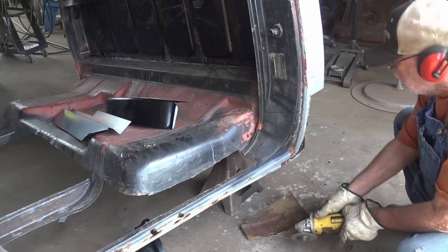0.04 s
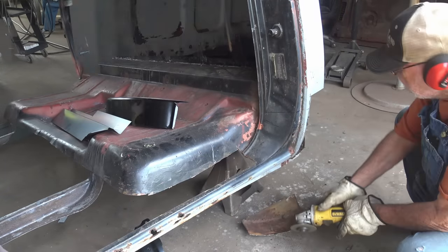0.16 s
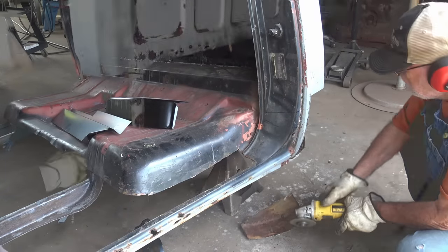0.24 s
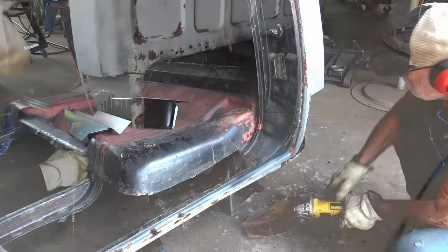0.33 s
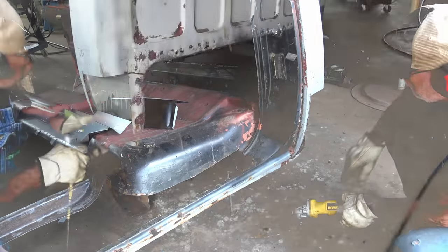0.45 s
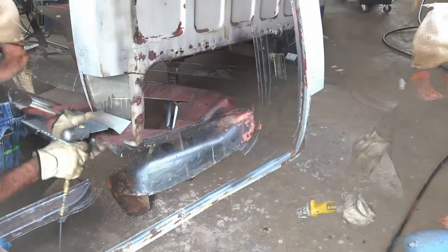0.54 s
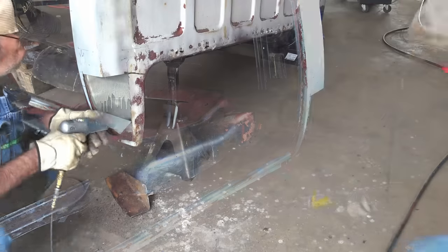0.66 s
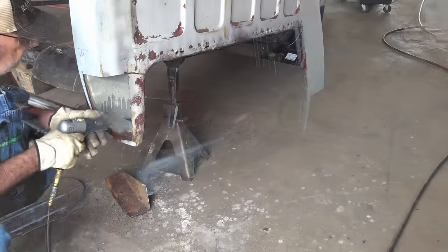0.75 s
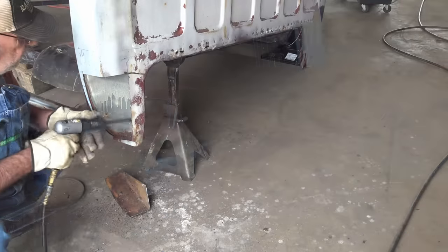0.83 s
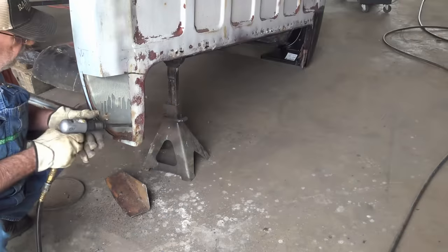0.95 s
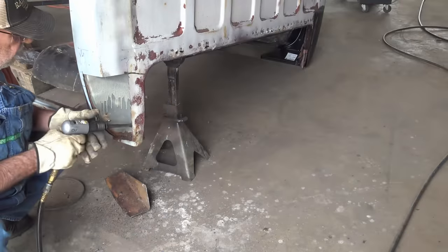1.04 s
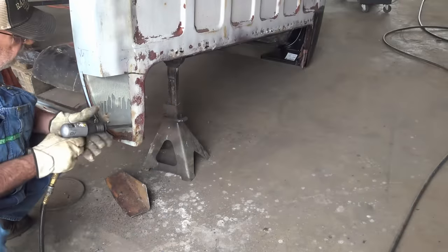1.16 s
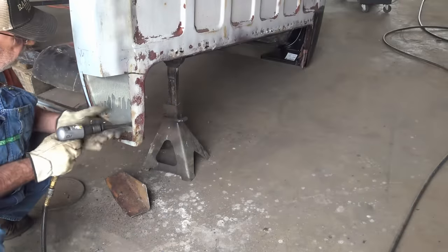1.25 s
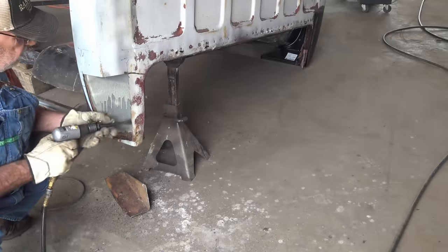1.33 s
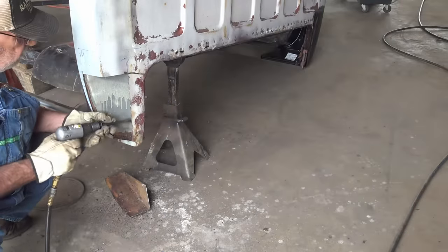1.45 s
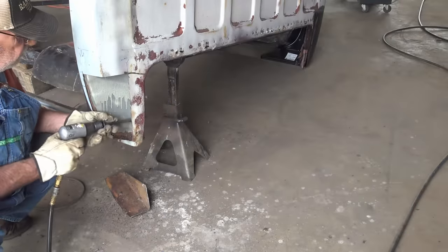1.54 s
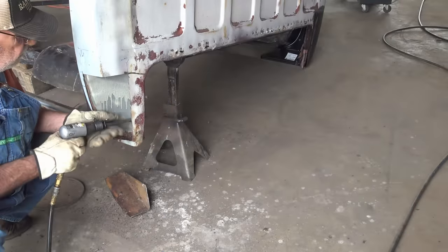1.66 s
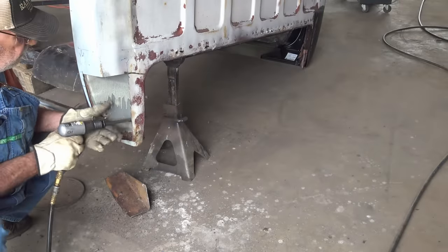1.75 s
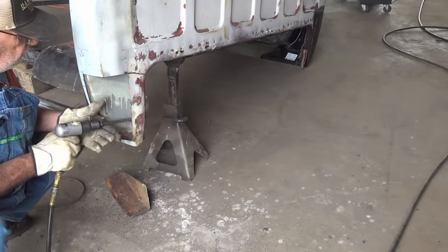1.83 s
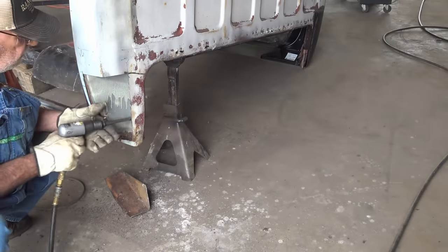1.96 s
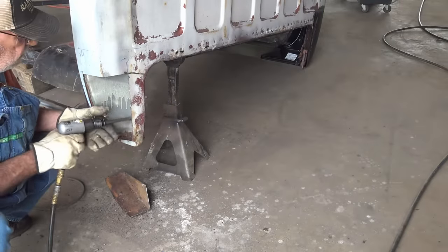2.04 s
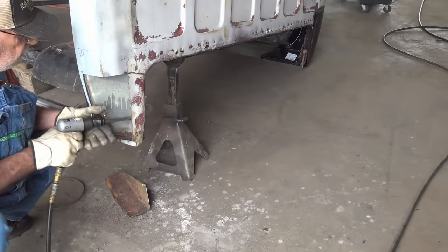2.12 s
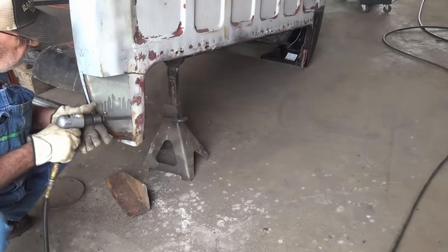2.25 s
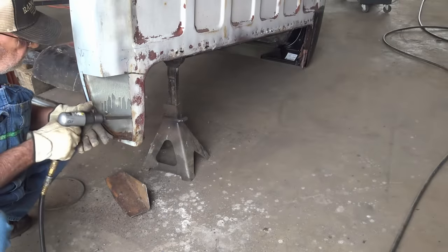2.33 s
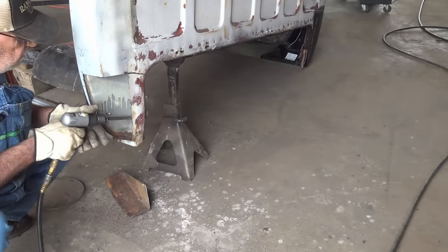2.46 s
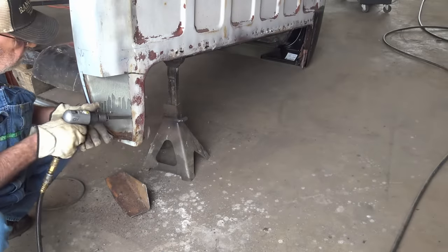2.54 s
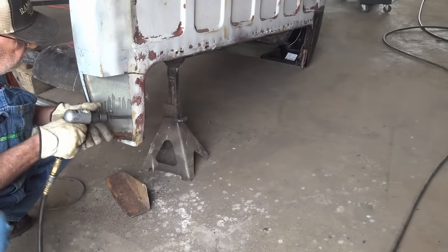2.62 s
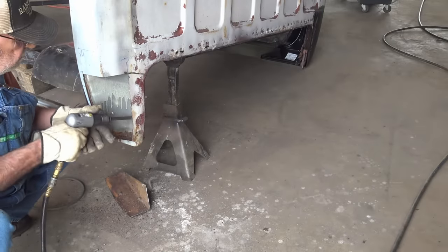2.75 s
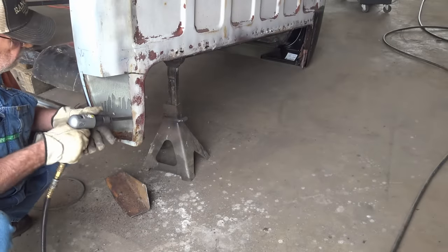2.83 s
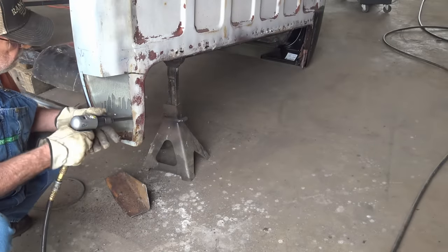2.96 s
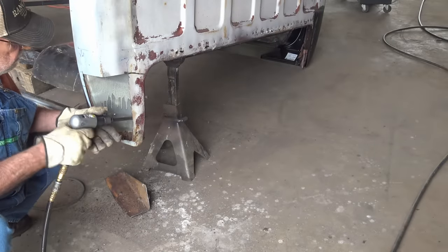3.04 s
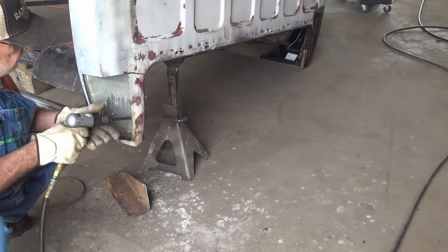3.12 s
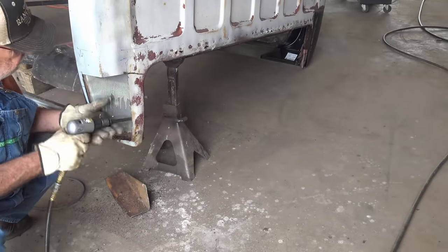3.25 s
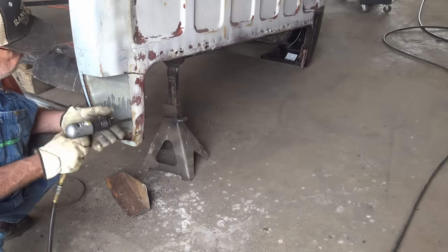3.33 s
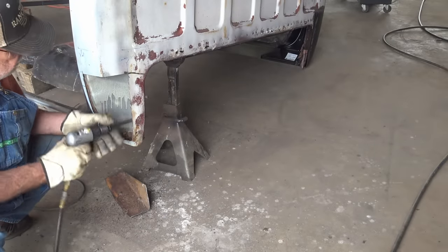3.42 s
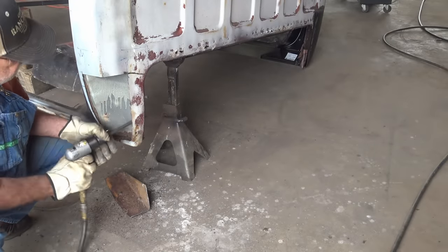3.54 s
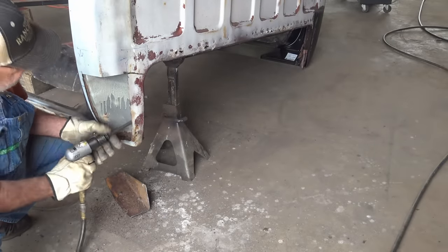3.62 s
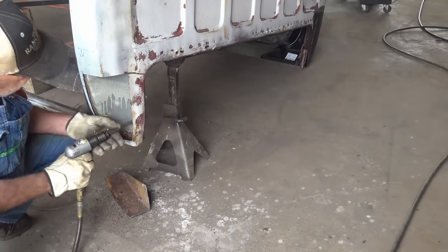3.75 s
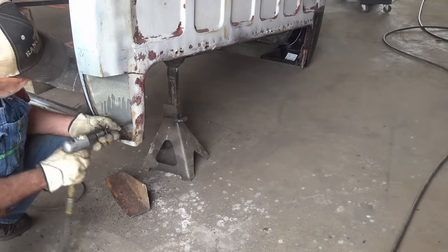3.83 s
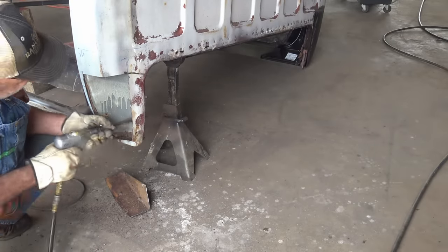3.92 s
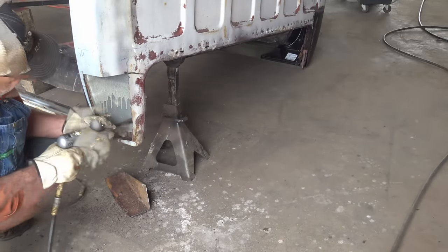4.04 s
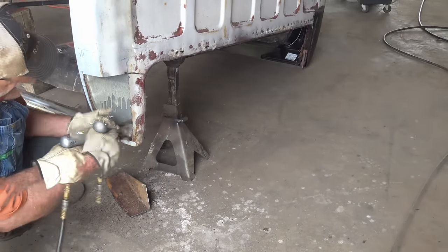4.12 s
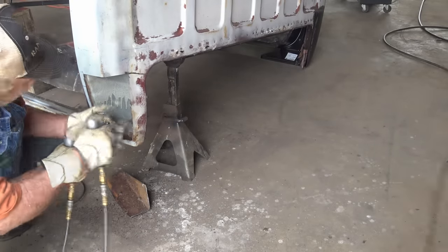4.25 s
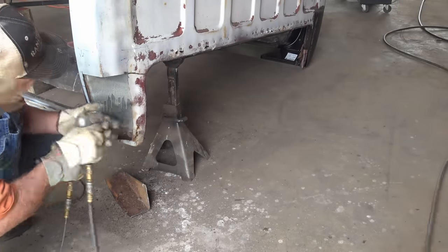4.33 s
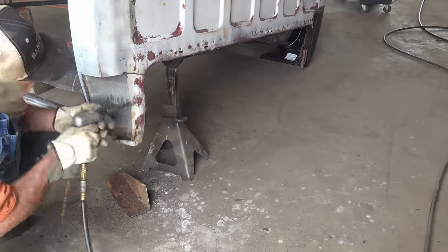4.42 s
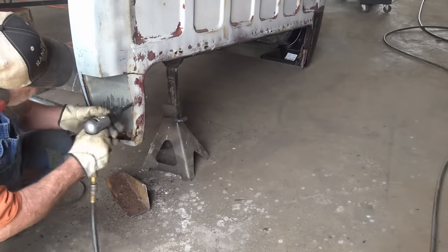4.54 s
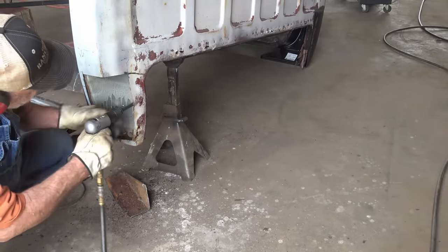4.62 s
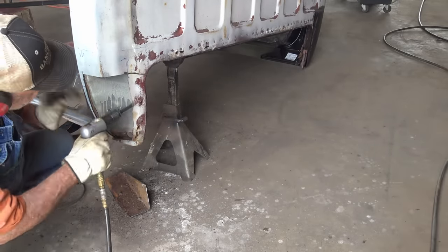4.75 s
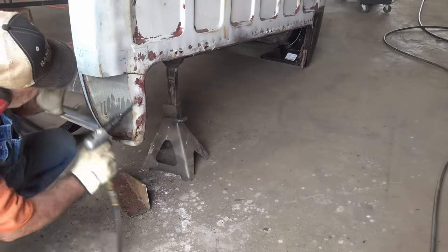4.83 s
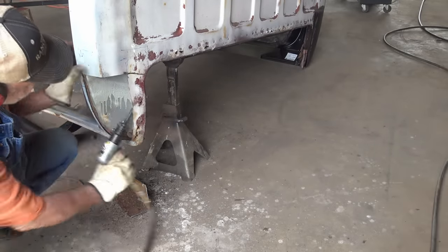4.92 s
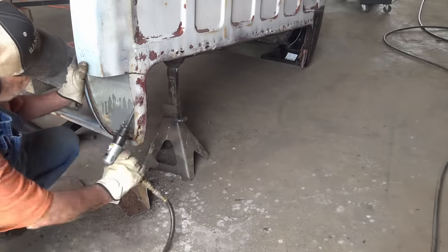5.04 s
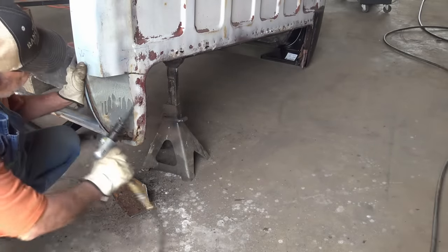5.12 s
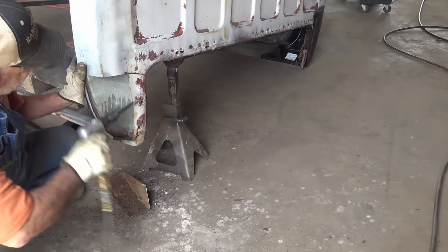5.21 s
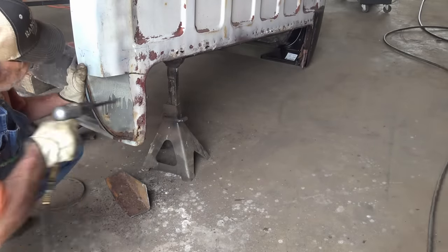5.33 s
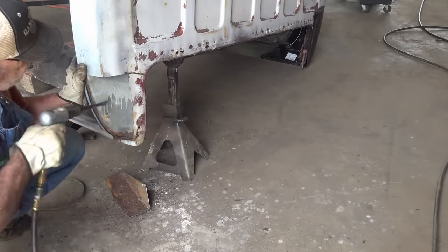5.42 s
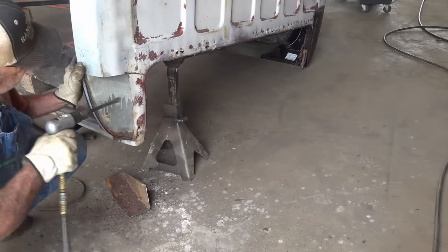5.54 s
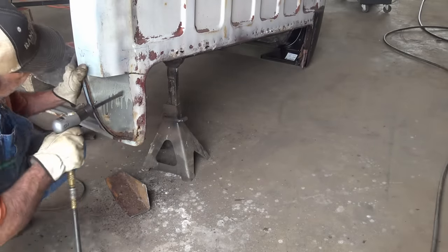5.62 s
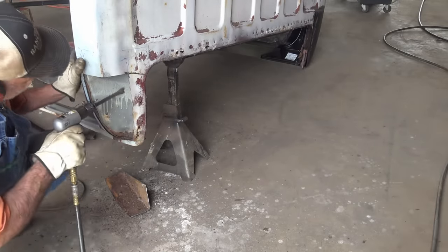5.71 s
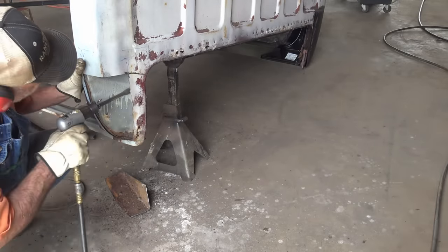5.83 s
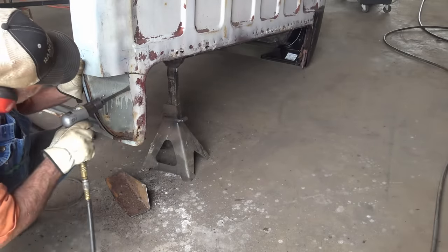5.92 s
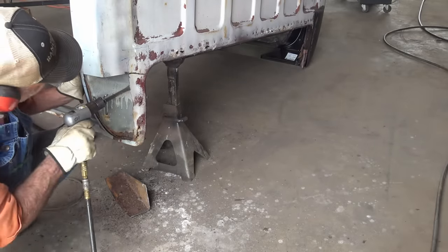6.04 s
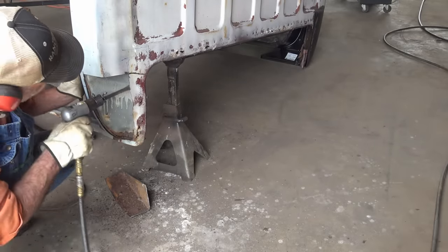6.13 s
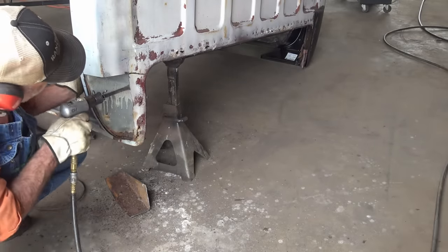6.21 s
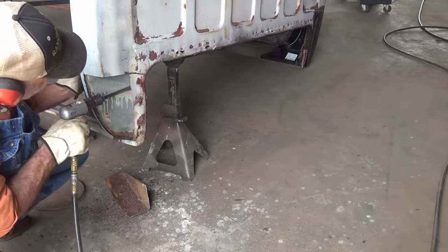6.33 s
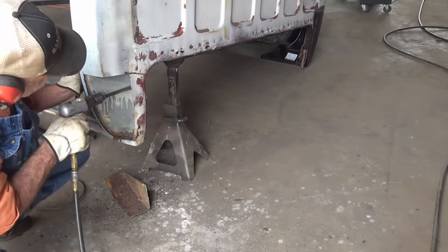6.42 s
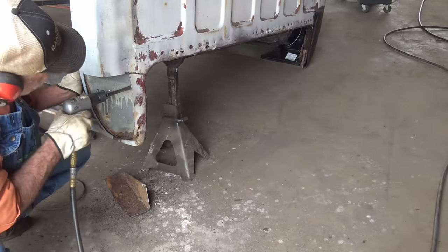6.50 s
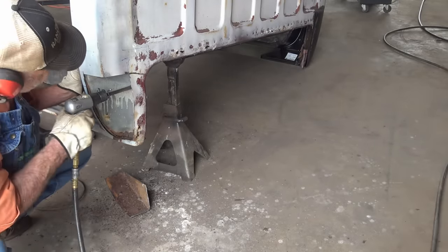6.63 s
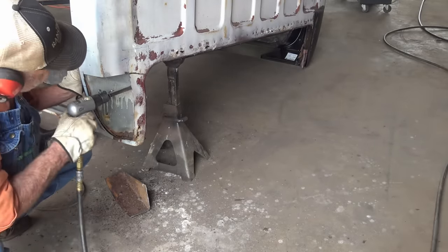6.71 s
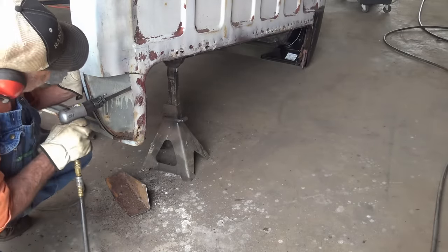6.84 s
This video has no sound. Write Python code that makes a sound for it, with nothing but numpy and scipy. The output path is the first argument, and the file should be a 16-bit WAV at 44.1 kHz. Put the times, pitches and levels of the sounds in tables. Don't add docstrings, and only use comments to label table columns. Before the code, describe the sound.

In a hard-walled workshop, a slowing grinder gives way to escaping air and a pneumatic chisel striking a truck body. Four rapid, clattering bursts come in the first half, bright steel cracks with ringing bit and booming panel. Quieter pauses hold hiss, hum and small metal taps; the hose spits, the bit knocks, then one last gentler burst. Close but roomy, with the microphone's gain dipping and recovering.

```python
import sys
import numpy as np
from scipy import signal
from scipy.fft import rfft, irfft, next_fast_len
from scipy.io import wavfile
from scipy.ndimage import uniform_filter1d, minimum_filter1d

SR = 44100
rng = np.random.default_rng(int(sys.argv[2]) if len(sys.argv) > 2 else 0)


def pcm_store(signal):
    levels = np.round(np.clip(np.atleast_2d(signal), -1, 1) * 32767)
    wavfile.write(sys.argv[1], SR, levels.astype(np.int16).T)


def nominal_scale(level):
    x = np.asarray(level, float) / 20
    return 10 ** x


N = 302967
T = np.arange(N) / SR
OPEN_S, CUT_S = 0.573, 4.245

# (frequency [Hz], level [dB per Hz])
RUMBLE_TONE = [(20, -16), (32, 13), (47, -1), (60, 9), (90, -1), (125, 5), (200, -16)]
# (frequency [Hz], width [Hz], level [dB])
SHED_HUM = [(140, 12, -1), (162, 7, -4), (188, 6, 0), (212, 6, -3), (300, 4, 1), (393, 4, 1)]
# (frequency [Hz], t60 [s])
ROOM_DECAY = [(130, 1.54), (300, 1.09), (600, 0.89), (1000, 0.87), (2500, 0.72), (6000, 0.59),
              (15000, 0.21)]
# (frequency [Hz], level [dB])
WALL_TONE = [(100, -1), (1000, 5.5), (4000, -0.5), (9000, -4), (15000, 3)]
# (frequency [Hz], t60 [s], level [dB])
STAND_MODES = [(705, 3.4, -48), (709, 3.4, -52)]

# (time [s], whine [Hz], whine level [dB], roar level [dB])
SPIN_DOWN = [
    (0.0, 9440, -59, -51.5),
    (0.09, 9030, -62, -50.5),
    (0.29, 8340, -64, -57.5),
    (0.405, 7930, -67, -60),
    (0.548, 7340, -81, -75),
    (0.562, 7390, -87, -82),
]
# (frequency [Hz], level [dB per Hz])
ROAR_TONE = [(35, -78), (60, -66), (200, -49), (590, -14), (962, -12), (1270, -5.5), (2810, -5),
             (7850, -11.5), (9030, -11), (15800, -25)]
# (frequency [Hz], width [Hz], level [dB])
HOUSING_BANDS = [(1314, 38, -5), (2960, 160, -0.5)]
# (frequency [Hz], t60 [s], level [dB])
CUT_STEEL = [(177, 1, -74), (450, 1, -66), (695, 1, -63), (725, 1, -87)]

# (frequency [Hz], level [dB per Hz])
LEAK_TONE = [(40, -27), (90, -37), (130, 2), (250, 1), (400, -1), (520, -1.5), (800, -10), (2000, -12),
             (3900, -10), (5000, -9.5), (8400, -8.5), (12000, -9.5), (15800, -16.5), (17000, -48)]
# (frequency [Hz], width [Hz], level [dB])
NOZZLE_BANDS = [(2570, 330, -27), (3780, 1260, -10), (6670, 150, -22), (7970, 1100, -13)]
# (time [s], hiss [dB])
AIR_FLOW = [(0.573, -23.5), (0.82, -28.5), (1.05, -42), (1.8, -37.5), (2.1, -45), (3.4, -50), (3.62, -45.5),
            (3.9, -47), (4.243, -47), (4.247, -53), (4.78, -51.5), (5.28, -46.5), (5.31, -43.5),
            (5.67, -40.5), (5.8, -40.5), (6.3, -36), (6.6, -41), (6.87, -54)]
# (time [s], level over the flow [dB], half length [s])
HOSE_SPITS = [
    (4.808, 4.5, 0.034),
    (4.864, 6.5, 0.074),
    (4.932, 9.5, 0.041),
    (4.999, 13, 0.049),
]
# (frequency [Hz], level [dB])
PUFF_TONE = [(150, -13), (800, 1.5), (3000, 6.5), (8000, 9), (14000, 7)]

# (time [s], force [dB], sheet pitch [Hz])
TOUCHES = [(1.539, -18, 393), (1.585, -20.5, 524), (1.619, -20, 480), (1.66, -45, 700), (4.078, -19, 935),
           (4.1, -20, 380), (4.159, -16, 556), (4.162, -19.5, 900), (4.172, -24, 550), (4.183, -22, 437),
           (4.205, -30, 500), (4.213, -19, 312), (4.574, -21.5, 405), (5.303, -20.5, 1390),
           (5.311, -16, 1330), (5.346, -15.5, 556), (5.385, -17.5, 490), (5.42, -20, 423),
           (5.728, -25, 480), (5.734, -21, 1000), (5.738, -20, 2250), (5.728, -14.5, 1360),
           (5.757, -24, 860), (5.79, -20.5, 1300)]
# (multiple of the pitch [ratio], t60 [s], level [dB])
TOUCH_PARTIALS = [(.62, .015, -11), (1.0, .03, 0), (1.3, .012, -8), (1.6, .012, -7), (2.3, .008, -9),
                  (3.4, .006, -14)]
# (frequency [Hz], level [dB])
THUD_TONE = [(200, 8), (350, 8.5), (700, 2), (1300, -2.5), (1900, -7), (4500, -10.5)]

# (first blow [s], force [dB], valve puff [dB], puff lead [s], long ring [dB])
TRIGGER_PULLS = [
    (0.822, 1, -5, 0.008, 13),
    (1.818, 0, -5, .011, 11),
    (2.287, -3.5, -15, 0.0084, -1),
    (2.699, -5, -14.5, 0.0117, 1),
    (6.314, -9.5, -13, 0.0023, 7),
]
# (time [s], snap [dB], ring [dB])
FIRST_BLOWS = [(0.823, -24, -24), (0.8375, -9, -6), (0.8517, -11, -1), (0.8675, -7, -9), (0.8805, -13, -17),
               (0.8911, -6, -2), (0.9043, 4, -15), (0.9139, -9.0, -8), (0.9287, -6, -5), (0.9458, -7, -4.0),
               (0.9602, -10, -6), (0.977, -19.0, -26), (1.8162, -8, -2), (1.8304, -2, 4), (1.8454, -10, 0),
               (1.8592, -13, -1.0), (1.874, -8, 8), (1.8883, -18, -13), (1.902, -10, 2), (1.915, -5, -24),
               (1.9299, -19, 2.5), (1.9416, -18, -6), (1.9559, 2, -11), (1.9683, -26, 1), (1.985, -2, -23),
               (2.2866, -13, 1.5), (2.3008, -17.0, -6), (2.3168, -18.0, 3), (2.3308, 0, -15),
               (2.3413, -3, -16), (2.3513, 12, -22.0), (2.362, -8, -5), (2.3755, -10.0, 4),
               (2.3911, 8.5, -7), (2.4034, -8, 3), (2.4172, -16, -11), (2.4286, -12, 6), (2.443, -19, -8),
               (2.4571, 2, -16), (2.4681, -13, -15), (2.483, -24, 0)]
# (time [s], snap [dB], ring [dB])
LAST_BLOWS = [(2.697, -19, -5), (2.7113, -19, -11), (2.7256, -19, -2), (2.7404, -18, -2),
              (2.7552, -20.0, -2), (2.7691, -3, -9), (2.7796, -14, -1), (2.7943, -18.0, -7),
              (2.8084, 8, -6), (2.8189, -17, -4), (2.8335, 5, 5), (2.8436, -14, -12), (2.8581, -6, -3),
              (2.8692, -15.0, -11), (2.8825, 2, -8), (2.8949, -20.0, 3), (2.9097, 1, -16.0),
              (2.9193, -15, -13), (2.9312, -3, -17), (2.941, 11, -20), (2.9515, -9, -9.0),
              (2.9628, -6, -20.0), (2.9727, -11.0, 0), (2.9879, -1, 4), (3.0024, 5, -18.0),
              (3.0198, -25, -20), (6.314, -19, -8), (6.3241, -18, -15), (6.3366, -8, 2), (6.3509, -19, 2),
              (6.3631, -8, 4), (6.3809, -18.0, 2), (6.3946, -13, 1), (6.4071, 8.5, -8), (6.4182, -15, 1),
              (6.434, -19, 5), (6.4462, 0.0, -10), (6.4568, -13.0, -10), (6.4711, 12, -9),
              (6.4814, -15, -6), (6.4956, -11, 1), (6.5107, -11, 2), (6.5234, -18, -17)]
# (time [s], level [dB])
BEARING = [(.823, 0.5), (.84, 2), (.9, 0), (.977, 0), (1.816, 9), (1.83, 3), (1.9, 2), (1.968, -4.5),
           (1.985, -10), (2.287, 0.5), (2.38, 2), (2.483, 2), (2.697, 1), (2.85, 0.5), (3.02, 1),
           (6.314, 7), (6.33, 0), (6.43, 2.5), (6.523, 2)]
# (frequency [Hz], level [dB per Hz])
CRACK_TONE = [(60, 0), (136, -5.5), (249, -18.5), (353, -2), (745, -10), (4280, -12.5), (8820, -7),
              (11100, -10.5), (14700, -12.5), (15800, -68)]
# (frequency [Hz], t60 [s], level [dB])
SHEET_SLAP = [(1500, .0025, -3), (3600, .002, -3)]
# (frequency [Hz], t60 [s], level [dB])
PISTON_SNAP = [(8900, .004, 2), (14800, .0035, -2), (12600, .0012, 3)]
# (frequency [Hz], t60 [s], level [dB])
PANEL_MODES = [(145.3, 0.66, -3.5), (180, 0.11, -1), (219.9, 0.24, -3), (262, 0.71, -4.5),
               (275.2, 0.35, -1.5), (330.7, 0.076, 2), (349, 0.044, 12.5), (393, 0.042, 5.5),
               (427.7, 0.1, 3.5), (480, 0.055, 1.5), (524, 0.12, -4.5), (556.5, 0.058, -12.5),
               (634, 0.06, -3), (693, 0.11, -25), (810, 0.062, -16), (806, 0.027, -13), (1060, 0.021, -12)]
# (frequency [Hz], t60 [s], level [dB])
RIB_MODES = [(344.7, .3, -11.5), (426, 0.21, -5.5), (571.6, 0.33, -14.5), (700, 0.22, -16),
             (854, 0.15, -18.5)]
# (frequency [Hz], t60 [s], level [dB])
CHISEL_MODES = [(3610, .006, -14), (7820, .02, -6), (8350, .01, -2), (12100, .025, -10), (13380, .025, -10),
                (14230, .015, -16), (14782, .045, -1), (14870, .012, -4), (14988, .035, -6),
                (15057, .03, -7), (15400, .006, -10)]
# (frequency [Hz], t60 [s], level [dB])
SHANK_MODES = [(8300, .1, -20), (12100, .1, -27), (13370, .12, -21), (14790, .14, -13)]
# (time [s], frequency [Hz], t60 [s], level [dB])
CAUGHT_MODES = [(.944, 7830, .07, -9), (.867, 7830, .03, -11), (1.874, 13380, .03, -8),
                (1.888, 13380, .03, -7), (1.956, 13380, .04, -9), (1.985, 12100, .06, -9),
                (1.943, 12100, .03, -14), (.817, 3610, .012, -3), (1.8162, 430, .08, -4),
                (6.314, 455, .12, -8), (6.337, 440, .12, -10)]
# (frequency [Hz], level [dB])
BODY_TONE = [(150, -10), (350, -9), (600, -1), (900, 0), (2500, 5), (6000, 1.5), (14000, 0)]
# (frequency [Hz], level [dB])
SHED_LOW_CUT = [(60, -27), (105, -14.5), (125, -3.5)]

# (frequency [Hz], level [dB])
SENSE_TONE = [(200, -37), (1500, 10.5), (8000, 4.5)]
# (frequency [Hz], side minus mid [dB])
STEREO_WIDTH = [(100, -26.5), (500, -23), (1300, -25.5), (2400, -24), (4000, -24), (8000, -14),
                (15000, -15)]
# (time [s], left minus right [dB])
WORKER_PAN = [(0.0, 0.0), (0.73, 1.0), (1.22, -0.5), (1.82, 1.0), (2.2, -0.5), (2.39, 0.5), (4.23, -1.0),
              (4.8, -0.5), (6.58, 0.0), (6.87, -0.5)]


def unit(x):
    return x / np.sqrt(np.mean(x ** 2))


def table(points, hz):
    f, v = np.transpose(points)
    return np.interp(np.log(hz + 1), np.log(f), v)


def follow(points):
    return np.interp(T, *np.transpose(points))


def colour(x, points):
    length = x.shape[-1]
    size = next_fast_len(length)
    gain = nominal_scale(table(points, np.fft.rfftfreq(size, 1 / SR)))
    return irfft(rfft(x, size) * gain, size)[..., :length]


def ring(x, hz, t60):
    p = np.exp(2j * np.pi * hz / SR - np.log(1000) / (t60 * SR))
    y = signal.lfilter([0, p.imag], [1, -2 * p.real, abs(p) ** 2], x)
    return y / p.imag * np.sin(np.angle(p))


def resonant(bands):
    total = 0
    for hz, width, db in bands:
        t60 = np.log(1000) / np.pi / width
        total = total + nominal_scale(db) * unit(ring(rng.standard_normal((2, N)), hz, t60))
    return total


def strike(times, db, modes, scatter_db):
    chance = rng.standard_normal((len(times), len(modes)))
    out = np.zeros(N)
    for k, (hz, t60, mode_db) in enumerate(modes):
        push = np.zeros(N)
        push[(times * SR).astype(int)] = nominal_scale(db + mode_db + scatter_db * chance[:, k])
        sounding = slice(int(times.min() * SR), int((times.max() + 2 * t60) * SR))
        out[sounding] += ring(push[sounding], hz, t60)
    return out


def cracks(times, db, fall_s, rise_s=0.00022):
    push = np.zeros(N)
    push[(times * SR).astype(int)] = nominal_scale(db)
    rise = int(rise_s * SR) + 1
    shape = signal.lfilter(np.ones(rise) / rise, [1, -np.exp(-1 / (fall_s * SR))], push)
    return shape * unit(colour(rng.standard_normal(N), CRACK_TONE))


def middle(x, side=0):
    return x * np.array([[1], [side]])


def rumble():
    swell = np.interp(T, [3.2, 3.6], [0.55, 1])
    return nominal_scale(-60) * unit(colour(rng.standard_normal(N), RUMBLE_TONE)) * swell * (T > OPEN_S)


def room(x, wet_db):
    t = T[:SR]
    noise = rfft(rng.standard_normal((2, len(t))))
    octave = np.log2(np.fft.rfftfreq(len(t), 1 / SR) + 1)
    tail = 0
    for centre in np.arange(5, 15, 0.5):
        band = irfft(noise * np.clip(1 - 2 * abs(octave - centre), 0, 1), len(t))
        tail = tail + band * nominal_scale(-60 * t / table(ROOM_DECAY, 2 ** centre))
    tail = colour(tail, WALL_TONE) * np.clip(t / 0.0056, 0, 1) * nominal_scale(wet_db)
    cut = int(CUT_S * SR)
    wet = [signal.oaconvolve(part[None], tail, axes=1)[:, :len(part)] for part in (x[:cut], x[cut:])]
    wet = np.hstack(wet)
    return np.array([x + wet[0], wet[1]])


def stand():
    return middle(strike(np.array([3.1]), 0, STAND_MODES, scatter_db=0) * (T < CUT_S))


def leak():
    hiss = unit(colour(rng.standard_normal((2, N)), LEAK_TONE))
    return hiss + resonant(NOZZLE_BANDS) + nominal_scale(-11.5) * resonant(SHED_HUM)


def flowing_air():
    mean_db, hum_share = -50, 0.19
    db = follow(AIR_FLOW)
    for s, over_db, half_s in HOSE_SPITS:
        db = db + over_db * np.clip(1 - abs(T - s) / half_s, 0, 1)
    air = leak()
    hum = signal.sosfiltfilt(signal.butter(2, 740, fs=SR, output="sos"), air)
    hum_db = mean_db - 0.5 + hum_share * (db - mean_db)
    return (air - hum) * nominal_scale(db) + middle(hum, side=nominal_scale(9)) * nominal_scale(hum_db)


def grinder():
    s, *columns = np.transpose(SPIN_DOWN)
    hz, whine_db, roar_db = (np.interp(T, s, c) for c in columns)
    hz = hz + 12 * unit(ring(rng.standard_normal(N), 40, 0.042))
    whine_db = whine_db + 3 * unit(ring(rng.standard_normal(N), 25, 0.06))
    phase = 2 * np.pi * np.cumsum(hz) / SR
    tones = np.sqrt(2) * nominal_scale(whine_db) * (np.sin(phase) + nominal_scale(-22) * np.sin(phase / 26))
    for f, t60, db in CUT_STEEL:
        tones = tones + nominal_scale(db - 60 * T / t60) * resonant([(f, 25, 0)])[0]
    air = unit(colour(rng.standard_normal((2, N)), ROAR_TONE))
    roar = nominal_scale(roar_db) * unit(air + nominal_scale(-7.5) * resonant(HOUSING_BANDS))
    return (roar + middle(tones)) * (T < s[-1])


def knocks():
    times, db, _ = np.transpose(TOUCHES)
    rings = np.zeros(N)
    for s, force_db, hz in TOUCHES:
        modes = [(hz * multiple, t60, g) for multiple, t60, g in TOUCH_PARTIALS]
        rings += strike(np.array([s]), force_db, modes, scatter_db=1.5)
    thuds = colour(cracks(times, db - 1.5, fall_s=0.021), THUD_TONE)
    return nominal_scale(5.5 - 21) * rings, nominal_scale(-21) * thuds


def chisel():
    times, snap_db, ring_db = np.transpose(list(FIRST_BLOWS) + list(LAST_BLOWS))
    start, force_db, puff_db, lead, long_db = np.transpose(TRIGGER_PULLS)
    burst = np.searchsorted(start - 0.005, times) - 1
    db = force_db[burst]
    push_db = db + np.interp(times, *np.transpose(BEARING))

    panel = nominal_scale(-10) * strike(times, push_db, list(PANEL_MODES) + list(RIB_MODES), scatter_db=1.2)
    bit_modes = list(CHISEL_MODES) + list(SHANK_MODES)
    bit = nominal_scale(-8) * strike(times, db + ring_db + long_db[burst], bit_modes, scatter_db=4)
    for s, *mode in CAUGHT_MODES:
        bit = bit + strike(np.array([s]), 0, [mode], scatter_db=0)

    snaps = nominal_scale(9.5) * strike(times, db + snap_db, PISTON_SNAP[:1], scatter_db=0)
    rattle = nominal_scale(10.5) * strike(times, db + ring_db, PISTON_SNAP[1:], scatter_db=1.5)
    crack_db = push_db + 2.5 + 0.8 * rng.standard_normal(len(times))
    blows = cracks(times, crack_db, fall_s=0.0035)
    slaps = strike(times, push_db + 2, SHEET_SLAP, scatter_db=2.5)
    puffs = colour(cracks(start - lead, puff_db, fall_s=0.0068, rise_s=0.00095), PUFF_TONE)
    return panel + bit + snaps + rattle + blows + puffs - slaps


def gain_control(x):
    top_db, squeeze, release_db_s, attack_s = -25, 0.78, 169, 0.0098
    window = int(attack_s * SR)
    power = colour(x[0], SENSE_TONE) ** 2
    power = uniform_filter1d(uniform_filter1d(power, size=window), size=window)
    over_db = np.maximum(10 * np.log10(np.abs(power) + 1e-12) - top_db, 0)
    recovery = release_db_s * T
    held_db = np.maximum(np.maximum.accumulate(over_db + recovery) - recovery, 0)
    return x * nominal_scale(-squeeze * np.roll(held_db, int(0.3 * window)))


def limiter(x):
    peak_db, look_ahead_s = -16, 0.001
    ahead = int(look_ahead_s * SR)
    gain = np.minimum(nominal_scale(peak_db) / (np.abs(x[0]) + 1e-9), 1)
    return x * uniform_filter1d(minimum_filter1d(gain, size=2 * ahead + 1), size=ahead + 1)


def scene():
    rings, thuds = knocks()
    steel = nominal_scale(-16.5) * chisel() + nominal_scale(-1) * (thuds + nominal_scale(-12) * rings)
    heard = room(colour(steel, BODY_TONE), wet_db=-32)
    heard = heard + middle(nominal_scale(-9.5) * (rings + thuds))
    shed = limiter(gain_control(heard + flowing_air() + stand())) * (T > OPEN_S)
    mid, side = colour(shed, SHED_LOW_CUT) + grinder()
    mid = mid + rumble()
    side = colour(side, STEREO_WIDTH)
    lean = nominal_scale(follow(WORKER_PAN) / 2)
    return np.array([(mid + side) * lean, (mid - side) / lean])


def low_pass(x):
    return signal.sosfilt(signal.butter(12, 16830, fs=SR, output="sos"), x)


def record(dry):
    rounded = np.tanh(3 * dry) / 3
    bass_cut = signal.sosfilt(signal.butter(2, 35, "high", fs=SR, output="sos"), rounded)
    mix = signal.sosfilt(signal.ellip(10, 0.3, 45, 15820, fs=SR, output="sos"), bass_cut)
    return low_pass(mix)


dry = scene()
out = record(dry)
pcm_store(out)
```